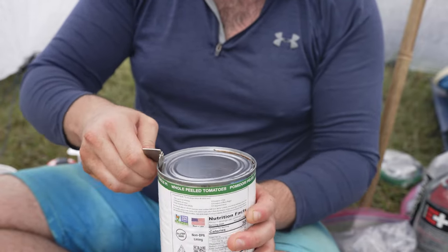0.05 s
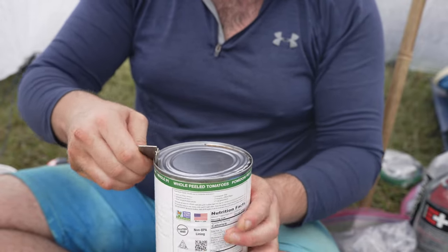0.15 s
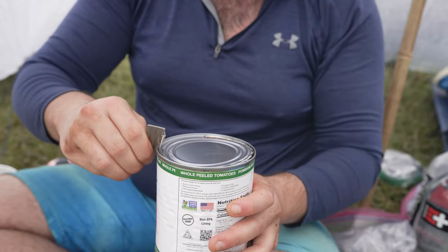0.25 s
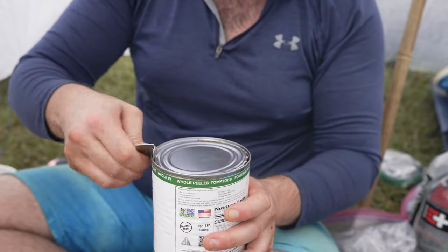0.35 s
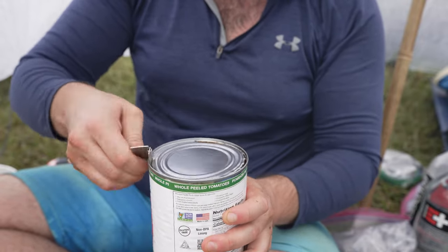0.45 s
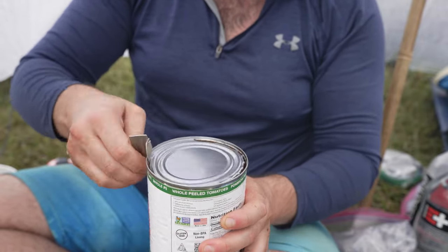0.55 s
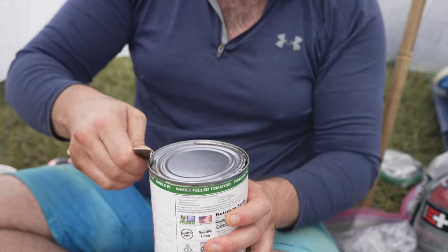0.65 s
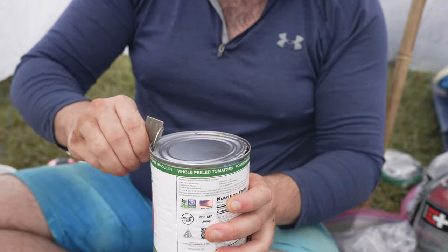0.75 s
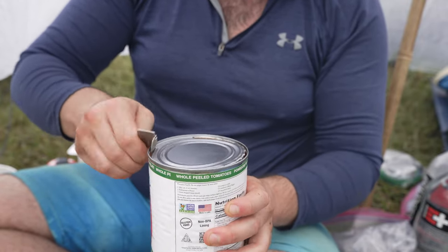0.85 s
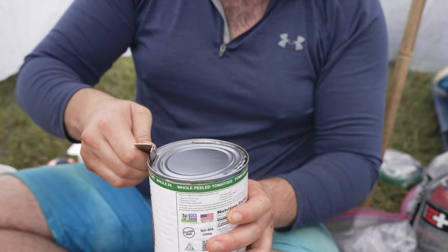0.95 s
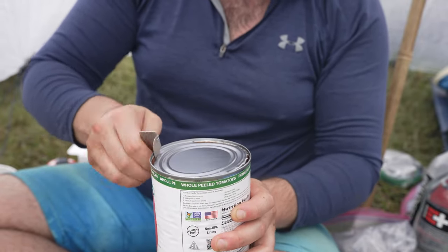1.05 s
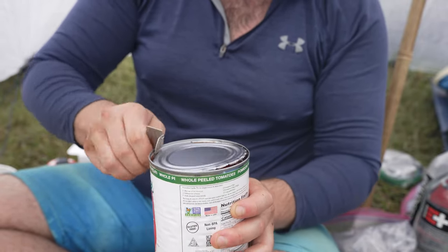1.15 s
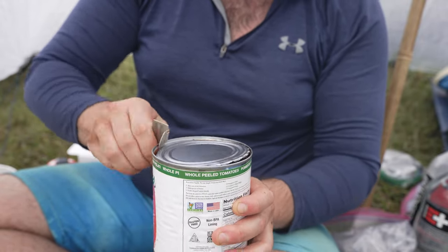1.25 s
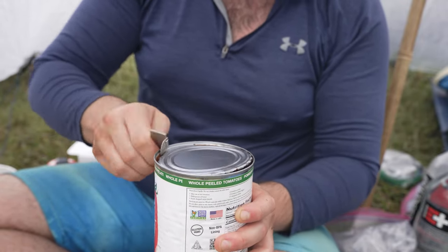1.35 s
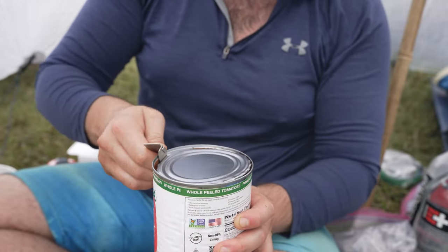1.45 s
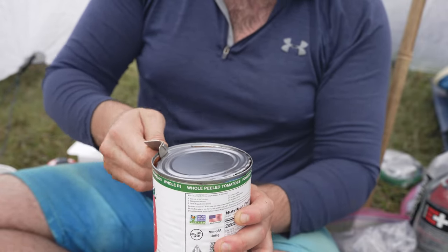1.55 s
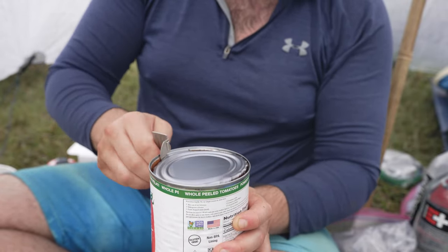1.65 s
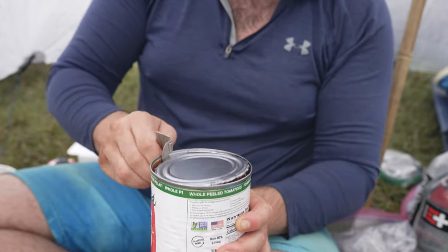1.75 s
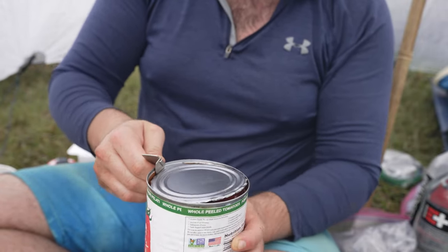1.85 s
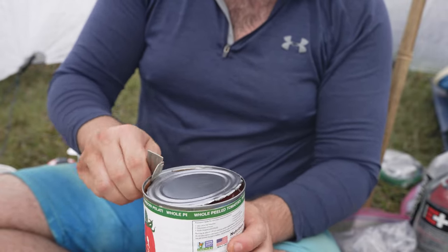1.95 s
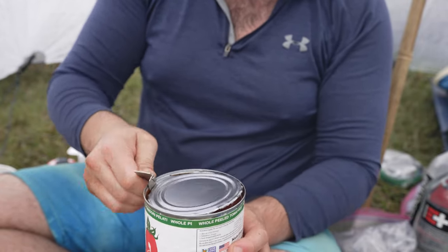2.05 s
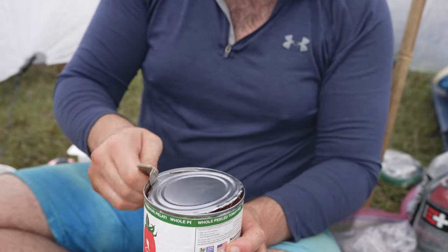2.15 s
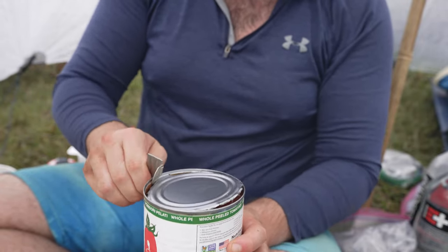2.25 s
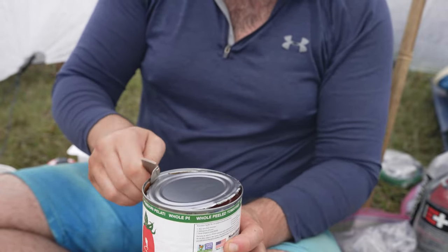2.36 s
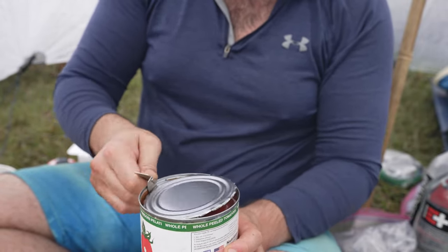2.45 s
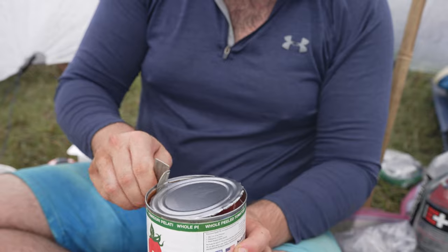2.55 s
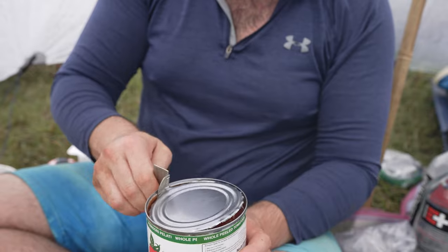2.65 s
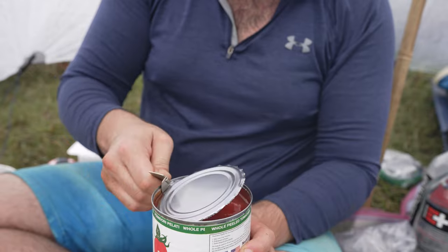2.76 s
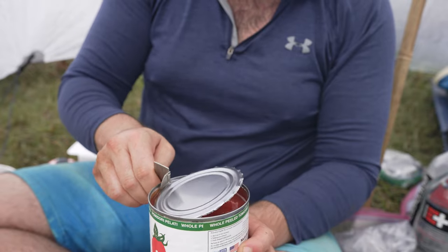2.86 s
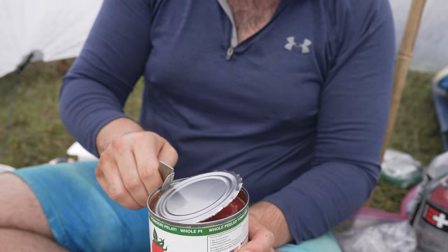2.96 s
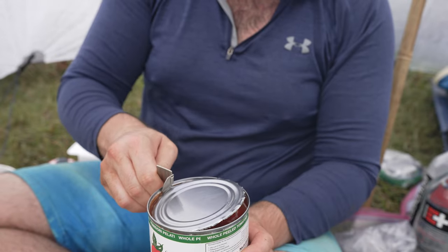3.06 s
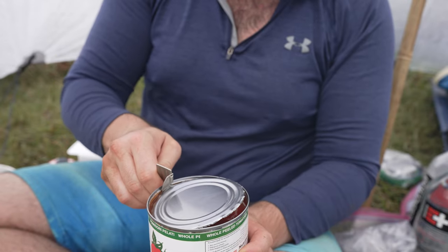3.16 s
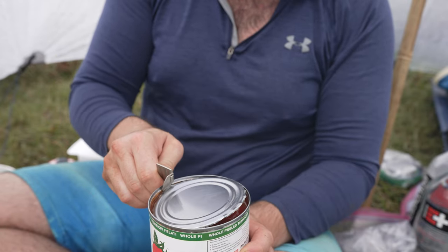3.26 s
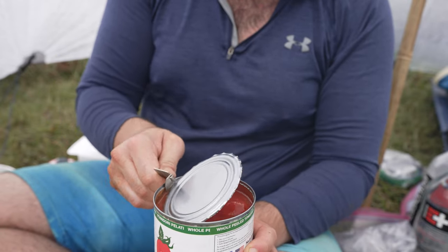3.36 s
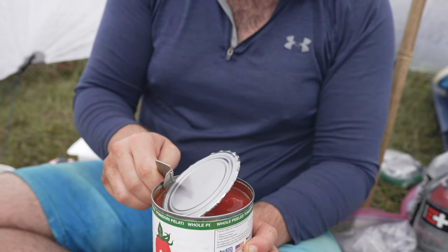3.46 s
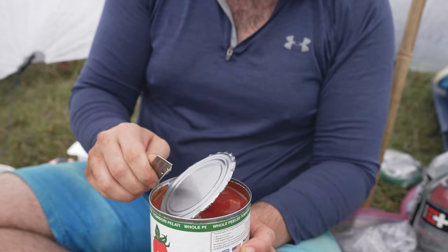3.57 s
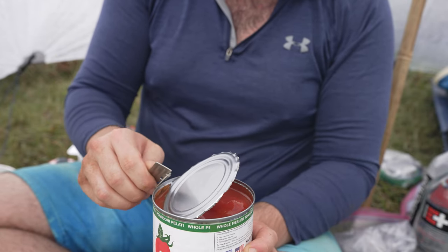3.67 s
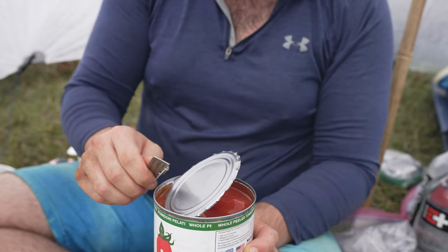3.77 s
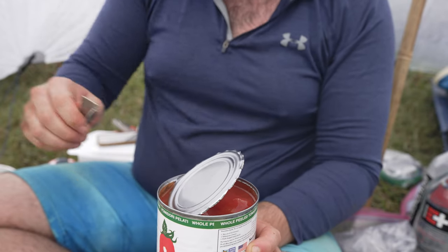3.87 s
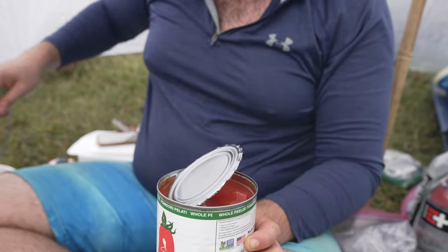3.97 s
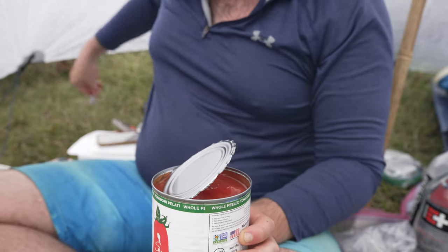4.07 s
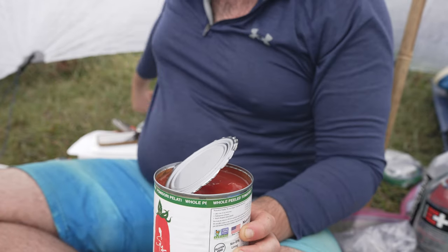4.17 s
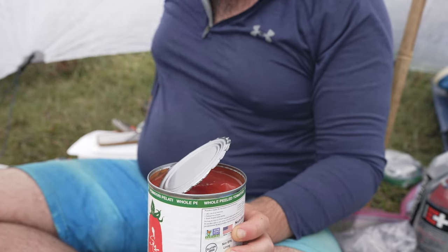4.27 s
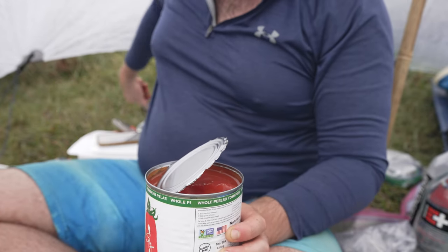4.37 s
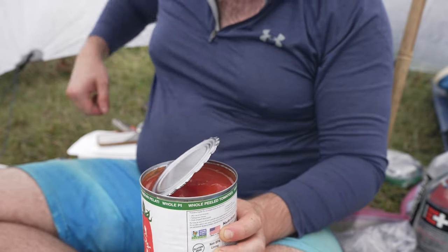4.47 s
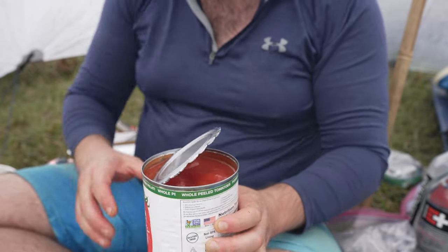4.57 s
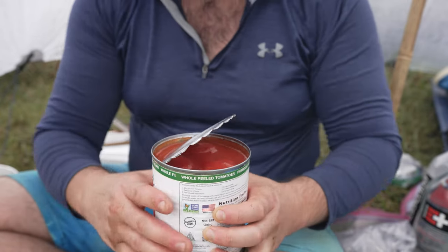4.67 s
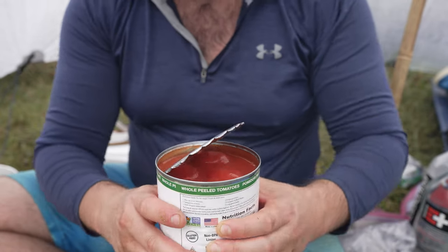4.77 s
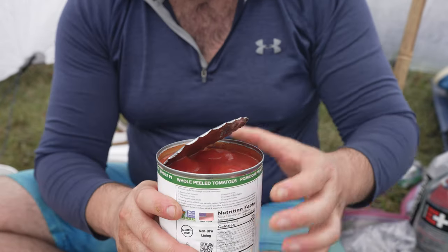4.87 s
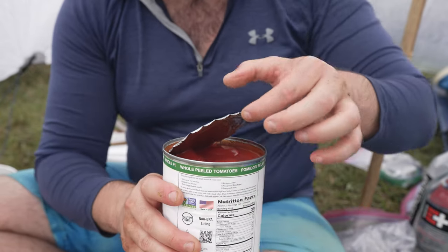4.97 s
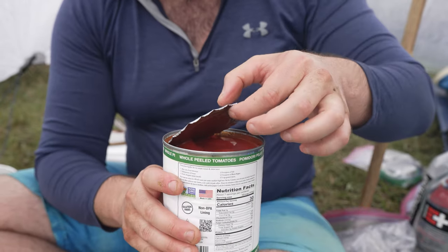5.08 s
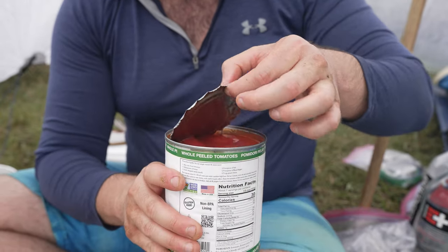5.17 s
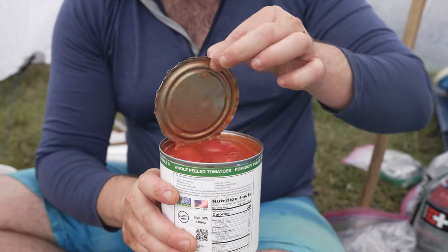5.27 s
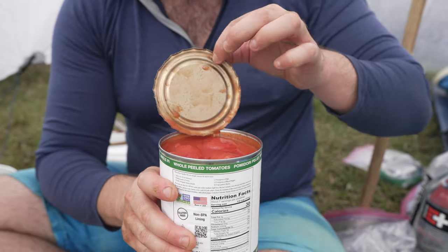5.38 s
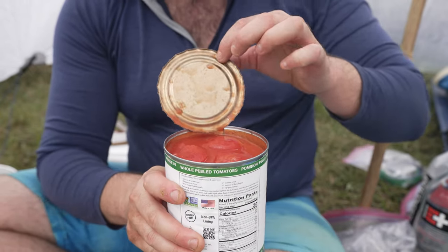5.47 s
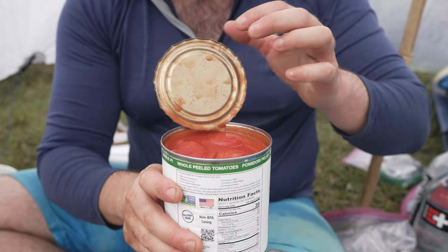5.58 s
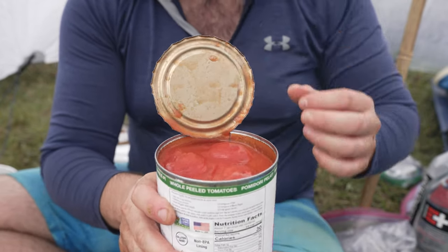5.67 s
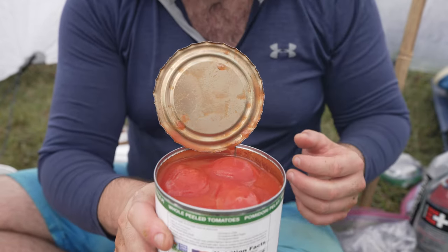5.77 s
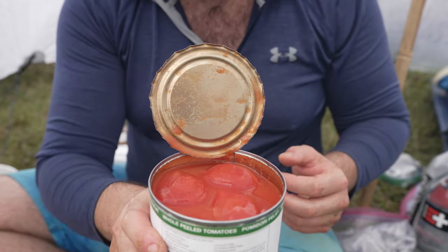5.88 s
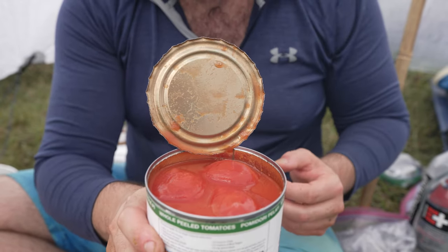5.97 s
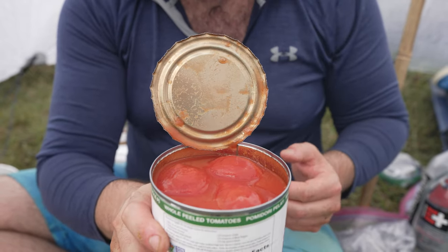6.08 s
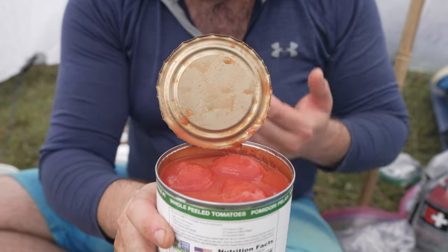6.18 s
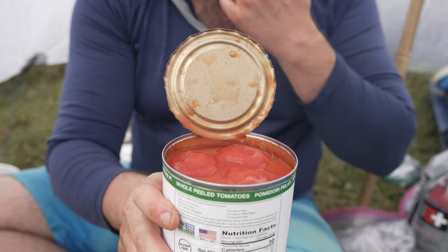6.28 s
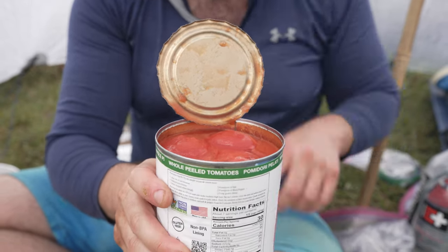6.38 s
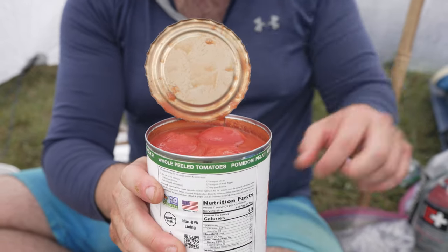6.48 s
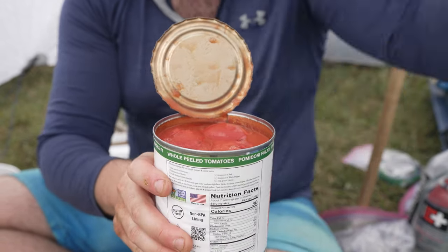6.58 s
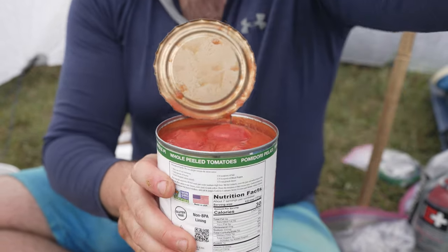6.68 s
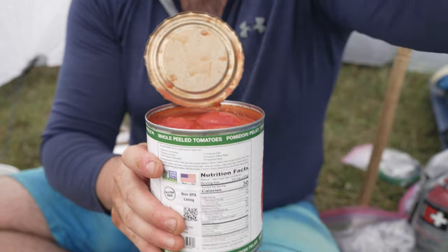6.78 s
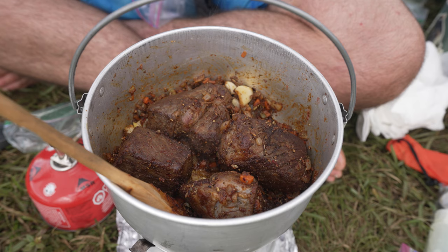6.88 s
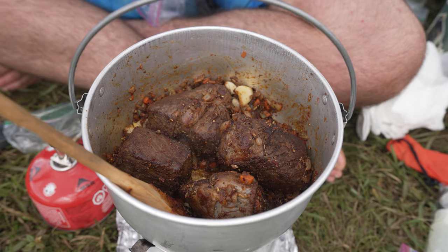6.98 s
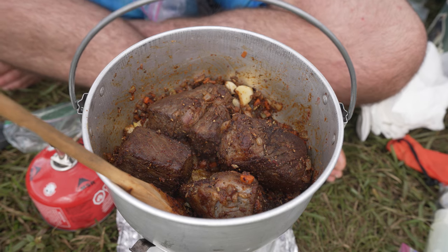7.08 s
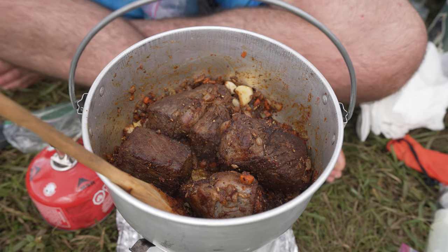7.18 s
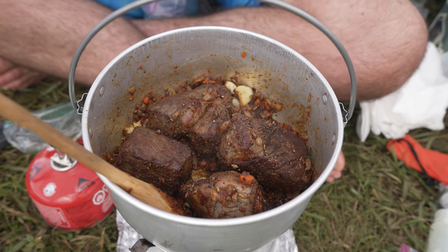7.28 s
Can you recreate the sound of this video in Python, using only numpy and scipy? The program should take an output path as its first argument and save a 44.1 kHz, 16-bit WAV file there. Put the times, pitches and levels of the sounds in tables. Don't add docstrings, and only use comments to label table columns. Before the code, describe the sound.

Over faint open air, distant machinery hum and cloth rustle, a hand opener bites sharply into a can, scraping and ticking along the rim, each cut quieter. Short dry lid knocks follow, then a bassless double clack as the tool lands among gear. Soft finger touches and a tinny lid snap come next, with bassy gusts on the close microphone and low mount thuds. A tiny gap cuts to gas hiss, pops and a faint steam squeak.

```python
import sys
import numpy as np
from scipy import signal
from scipy.fft import rfft, irfft, next_fast_len
from scipy.io import wavfile
from scipy.ndimage import uniform_filter1d

SR = 44100
rng = np.random.default_rng(int(sys.argv[2]) if len(sys.argv) > 2 else 0)


def how_loud(loudness_db):
    steps = np.asarray(loudness_db, float) / 20
    return 10 ** steps


def persist_wave(psi):
    counts = np.round(np.clip(psi, -1, 1) * 32767).astype(np.int16)
    wavfile.write(sys.argv[1], SR, np.atleast_2d(counts).T)


N = 323253
TIME = np.arange(N) / SR
FIRST_SHOT_END_S, STOVE_START_S = 6.9, 6.9165

BAND_EDGES_HZ = (650, 3550, 7500, 17000)
# [f/Hz, level per Hz/dB]
FIELD_TONE = [(18, -37), (30, -11.5), (316, -6), (360, -6), (550, -6), (862, -23), (1010, -27.5),
              (1180, -39), (1630, -28.5), (2060, -38), (16700, -51)]
# [f/Hz, level/dB]
FAR_HUM = [(425, -85), (570, -83), (680, -83.5)]
# [f/Hz, level per Hz/dB]
RUSTLE_SPECTRUM = [(500, -30), (1000, 6), (2000, 1), (4000, -1.5), (7000, -4.5), (12000, -6), (15500, -5),
                   (16700, -29.5)]
# [centre t/s, peak level/dB, fade per 10 dB/s]
SLEEVE_SWISHES = [(.12, -70.5, -0.2), (3.47, -75.5, 0.18), (4.02, -80, 0.1), (4.45, -72.5, -0.26),
                  (4.63, -71.5, 0.06), (4.8, -77.5, 0.35), (5.15, -72.5, -0.11), (5.6, -75.5, 0),
                  (5.95, -81.5, 0.23), (6.44, -78, 0.17), (6.53, -71.5, 0.1), (6.7, -70, 0.02)]
# [centre t/s, peak level/dB, fade per 10 dB/s]
WIND_GUSTS = [(.1, -77, 0.9), (.62, -67, -0.3), (1.06, -63.5, 0.22), (1.68, -69, 0.33), (2.1, -72.5, 0.6),
              (3.06, -68, 0.1), (3.4, -69.5, 0.05), (4.66, -68.5, 0), (5.3, -65, 0.3), (5.46, -49.5, 0.12),
              (5.63, -46, 0.11), (5.93, -48.5, 0.08), (6.08, -58, 0.3), (6.22, -69, 1.5), (6.48, -58, .07),
              (4.95, -72, 0)]
# [t/s, level/dB, build-up/ms, fall/ms, blade f/Hz]
BLADE_BITES = [(.006, -37, 4.7, 3.8, 4150), (0.0114, -30.5, 1.2, 1.1, 4070), (.035, -29.5, 1.26, 6, 4050),
               (0.1404, -32, 0.34, 5, 4230), (0.3421, -26.5, 2.5, 2.4, 4100), (0.36, -35, 4.8, 7.8, 4110),
               (0.3686, -31.5, 1.6, 4.5, 4090), (0.4759, -33, 9.4, 3.2, 4210),
               (0.536, -38, 11.6, 9.2, 4020), (0.6053, -33.5, 1.1, 3.5, 4100), (0.676, -27.5, 6, 2.3, 4230),
               (.679, -25, 1.1, 2.4, 4045), (.687, -38.5, 2.6, 2.2, 4300), (0.8378, -33, 2.2, 3, 4220),
               (0.844, -24, 0.95, 1.7, 3800), (0.8513, -29, 3.4, 4.7, 3990), (0.9701, -31, 1.3, 4.4, 4140),
               (0.9764, -29, 3, 4.7, 4250), (1.1067, -24.5, 3.8, 9.9, 4030), (1.156, -33, 1.6, 1.8, 3960),
               (1.163, -29.5, 1.4, 2.3, 4240), (1.2194, -31, 4, 6, 4210), (1.3356, -41, 0.65, 2, 3830),
               (1.3502, -34, 9, 2.2, 4340), (1.458, -30, 3.6, 8.8, 4350), (1.4768, -42, 1.3, 12, 4440),
               (1.5738, -32.5, 2.9, 5.3, 4450), (1.583, -38, 1.9, 5.6, 4180), (1.704, -32, 2.5, 4.3, 4060),
               (1.7132, -34.5, 3.1, 4.6, 4180), (1.8038, -39, 1.5, 7.6, 4300), (1.812, -37.5, 3.6, 3, 4440),
               (1.82, -38.5, 5.9, 1.7, 4330), (2.052, -46.5, .5, 9.7, 4330), (2.0648, -44.5, 3, 3.3, 4340),
               (2.205, -41.5, 11.5, 3.7, 4540), (2.341, -39.5, 3.3, 2.4, 4530),
               (2.483, -39.5, 1.6, 1.7, 4770)]
# [t/s, level/dB, build-up/ms]
BLADE_SCRAPES = [(0.075, -52, 3.1), (.2625, -52.5, 6.4), (0.3052, -58, 29), (0.4164, -44.5, 7.2),
                 (0.429, -56, 6), (0.4573, -51, 1.3), (0.741, -44, 3), (0.763, -39, 6), (0.781, -53, 7.3),
                 (0.8945, -52.5, 3.7), (0.9155, -42.5, 8.8), (1.0445, -44, 11.4), (1.093, -55.5, 5.4),
                 (1.201, -42.5, 3.5), (1.281, -47, 7.1), (1.2983, -39, 7), (1.315, -42, 3.4),
                 (1.3964, -54.5, 5.5), (1.4225, -42, 8.9), (1.536, -50, 21), (1.561, -42.5, 3.3),
                 (1.6383, -55.5, 7.9), (1.657, -55.5, 11), (1.779, -53, 24), (1.967, -58, 5.5),
                 (1.988, -60, 6.2), (2.0184, -61, 3), (2.265, -60, 4.6), (2.1417, -62.5, 25),
                 (2.279, -51, 3.7), (2.4204, -58, 31), (2.569, -55, 2.4), (2.5973, -55, 15)]
# [t/s, level/dB, treble/dB]
HOOK_TICKS = [(0.0878, -55.5, 0), (0.423, -48, -9), (0.509, -44.5, -21), (0.5167, -42, -17),
              (0.531, -40, -4.5), (0.5605, -48, -6), (0.6346, -44, -13), (0.8089, -43, -12),
              (0.943, -53, -32), (0.987, -43, -22), (1.0193, -47.5, -22), (1.0547, -49, -6),
              (1.0733, -50, -19), (1.2595, -42, -20), (1.289, -53, -6), (1.3071, -40.5, -3),
              (1.324, -44, -26), (1.3315, -48, -22), (1.3407, -34.5, -5), (1.468, -38.5, -1),
              (1.5514, -48, -11), (1.686, -48.5, 1), (1.6927, -40, -10), (1.862, -48, 0.5),
              (1.892, -58.5, 8), (1.9015, -61, 0), (2.1736, -54, 4), (2.3128, -50.5, 3.5),
              (2.3306, -42.5, -5), (2.4933, -46, 3.5), (.108, -73, 12), (.166, -67, 1), (0.212, -67, -12),
              (1.781, -50.5, 6.5), (1.945, -62, 0), (2.15, -62, 2), (2.651, -72, 2), (2.933, -68.5, -6.5),
              (2.96, -72, -13)]
# [f/Hz, level/dB, t60/s]
RIM_MODES = [(910, -12.5, 0.014), (1161, -12.5, 0.031), (1653, -1, 0.025), (2170, 10.5, 0.0037),
             (2626, 1.5, 0.013), (3690, -6.5, 0.021), (3970, -6, 0.014), (4230, 0, 0.013), (4230, 2, 0.02),
             (4400, -3.5, 0.029), (5000, -2, 0.014), (5406, -5, 0.031), (5990, -1.5, 0.014),
             (6320, -5, 0.022), (6540, -5, 0.01), (8580, -8, 0.0063), (10300, -11, 0.0034),
             (11460, -10, 0.0043), (13350, -6, 0.007)]
# [t/s, f/Hz, level/dB, t60/s]
RING_ON = [(0.0146, 4340, -44.5, 0.068), (.0355, 5000, -46, .04), (0.1395, 1620, -58, 0.07),
           (0.3686, 1120, -49.5, 0.07), (0.5378, 1670, -58, 0.11), (.8444, 2240, -38.5, .04),
           (.845, 3740, -28.5, .035), (.8515, 3820, -29, .04), (0.343, 2450, -34, .02),
           (0.6794, 4027, -26, .025), (1.1073, 930, -43.5, 0.054), (1.107, 5300, -34, 0.04),
           (1.165, 4130, -29, 0.057), (1.163, 2674, -45, 0.073), (1.219, 1560, -49, 0.1),
           (1.219, 4340, -31.5, 0.063), (1.467, 4435, -37.5, 0.082), (1.5734, 4230, -43.5, 0.096),
           (1.713, 4210, -38.5, 0.071), (1.7137, 5319, -48, 0.055), (1.819, 1580, -47, .05),
           (1.863, 4230, -49, 0.065), (2.7478, 1100, -55, .06), (3.3371, 4500, -45, .022),
           (3.3371, 6470, -42, .035), (3.6105, 860, -54.5, 0.042), (4.3436, 2519, -39, 0.042),
           (4.341, 9250, -39.5, 0.036), (4.341, 4440, -31.5, .025), (4.3445, 5390, -35.5, .025),
           (3.7911, 1520, -44, .012), (3.834, 5450, -39.5, .03), (0.3407, 8250, -39, 0.023),
           (0.011, 10300, -46, .02), (0.033, 5750, -40, .025), (.034, 8500, -35.5, .03),
           (.034, 10300, -42, .02), (0.1397, 6180, -36.5, .045), (0.1393, 8550, -47, .04),
           (5.258, 6900, -56, .05), (5.251, 9000, -38.5, .02)]
# [t/s, level/dB]
ARM_EFFORT = [(0, -84), (.5, -67), (.75, -70), (1.3, -57), (1.42, -65), (1.88, -69.5), (1.96, -63),
              (2.15, -63), (2.23, -84), (2.38, -64), (2.55, -68), (2.63, -85.5), (2.8, -72.5),
              (2.95, -79.5), (3.1, -96)]
# [t/s, level/dB, f/Hz, t60/s]
MOUNT_THUMPS = [
    (.995, -55, 100, 0.44),
    (3.025, -55, 140, .1),
    (6.736, -37, 124, 0.061),
    (6.805, -41.5, 294, 0.019),
    (6.856, -36.5, 413, 0.012),
    (5.47, -36.5, 45, .1),
    (5.646, -42.5, 170, 0.099),
    (5.668, -39.5, 74, 0.12),
    (5.91, -32, 62.8, 0.13),
    (5.951, -35, 70.5, .09),
]
# [t/s, level/dB, build-up/ms, fall/ms, treble/dB]
LID_PRYING = [(2.7377, -34, 1.2, 0.2, -8), (2.7464, -34, 3.8, 1.3, -3), (2.7842, -52.5, 26, 0.88, -4.5),
              (2.8778, -51.5, 3.9, 1.45, -11), (3.247, -72.5, 1, 0.97, 2), (3.28, -72.5, 8, 12, 6),
              (3.3755, -63, 6.2, 20, -7), (3.4772, -53, 1.6, 0.7, -9), (3.501, -61, 2.6, 5, -4),
              (3.389, -61.5, 2.8, 2.6, -5), (3.458, -70, 1.1, 1.5, 2), (3.595, -64, .7, 5, -1),
              (3.6043, -61, 3.9, 2.3, -14.5), (3.6103, -48.5, 9, 3.5, 6.5), (3.7045, -54, 0.18, 1.3, 11),
              (3.716, -68, 4.4, 13, 13), (3.7485, -56.5, .2, 1.8, 14), (3.757, -73, 4, 6, 4),
              (3.764, -60, 0.37, 1.5, 8), (3.7911, -48, 0.6, 3.2, 3.5), (3.7988, -51, .5, 5.5, 4),
              (3.805, -58, 0.23, 2.2, 11), (3.8345, -39.5, 1.4, 3.2, 4.5), (3.8465, -59, 4, 4.3, 6.5)]
# [f/Hz, level/dB, t60/s]
LOOSE_LID_MODES = [(1260, -10, 0.011), (1656, 22, 0.0028), (2446, 8, 0.018), (3020, 17, 0.0036),
                   (4540, -5, 0.023), (4930, -9.5, 0.0086), (5450, -0.5, 0.011), (6400, -6, 0.013),
                   (9460, -12.5, 0.011), (10940, -26, 0.0046), (14050, 0, 0.003)]
# [t/s, f/Hz, level/dB, t60/s]
BENT_LID_RINGS = [(3.3374, 8900, -35.5, .014), (3.3374, 5450, -43, .012), (6.2133, 3370, -48.5, 0.011),
                  (3.3374, 1470, -46.5, 0.0094), (5.253, 205, -42.5, 0.028), (5.2535, 810, -35, 0.017),
                  (5.2575, 1800, -43, 0.04), (5.256, 4400, -38.5, 0.018), (5.2587, 2960, -50.5, 0.087),
                  (5.4504, 1515, -55, 0.025), (5.451, 3420, -57, 0.02), (5.5602, 4400, -51, 0.035),
                  (5.561, 1460, -55, 0.033), (5.5617, 1840, -62, 0.095)]
# [t/s, level/dB, length/ms, treble/dB, body/dB]
FINGER_TOUCHES = [(3.3385, -44, 0.51, -8, -15), (4.433, -67, 1.8, -3, -2), (4.8822, -55.5, 0.62, 4.5, -5.5),
                  (5.0775, -69.5, 1.8, -1, -3), (5.104, -62, 0.48, -15, 0), (5.16, -63.5, 2, -0.5, -0.5),
                  (4.671, -74.5, 0.91, -12.5, 5), (4.8646, -75, 1.05, 5.5, -6), (5.2425, -70, 1.8, -12, 8),
                  (5.2518, -43.5, 0.96, 2, 0), (5.2547, -42, 0.73, -9, -1), (5.2575, -38, 1.2, -3, -4),
                  (5.4517, -60.5, 4.8, -10, -12), (5.561, -54, 2.9, -11, -9),
                  (6.2143, -58.5, 1.2, -11, -11), (6.221, -65, 0.54, -4, -9), (6.2816, -49, .2, 1, -24),
                  (6.3026, -67.5, 5.8, -11, -18), (6.348, -80, 0.98, 20, -13),
                  (6.4412, -63.5, 1.5, -1.5, -2.5), (6.463, -60.5, 3.9, -4, -6),
                  (6.478, -63.5, 4.2, -2, 0.5), (6.4828, -56, 0.86, -12, -9), (6.515, -64.5, 3, -1, -9),
                  (6.807, -66.5, 1, -23, 3.5), (6.86, -74, 2.4, 3, 9.5), (6.8718, -53, 1.05, -6, -11)]
# [f/Hz, level/dB, t60/s]
SOFT_MODES = [(1400, 0, .006), (2300, 0, .006), (3600, -2, .005), (4350, -1, .008), (5200, -2, .006),
              (8500, -4, .003), (12000, -5, .002)]
# [t/s, level/dB, build-up/ms, fall/ms, treble/dB, body/dB]
OPENER_LANDING = [
    (4.3128, -30.5, 0.34, 2.8, -5.5, -9.5),
    (4.3148, -30, 1.6, 5.2, -8.5, -10),
    (4.3305, -46, 1.5, 4, 1, -4.5),
    (4.3361, -25.5, 1.4, 2, -2, -18),
    (4.3395, -29.5, 1, 2.2, -3, -9.5),
    (4.3425, -22, 1.5, 4.7, -6.5, -13.5),
    (4.3505, -34, 1.8, 4.3, -4, -7),
    (4.3565, -40.5, 1.6, 5, -4, -4.5),
    (4.364, -47.5, 1.8, 11, -3, -3.5),
]
# [f/Hz, level/dB, t60/s]
TOOL_MODES = [(1100, -17.5, 0.0035), (1820, -9, 0.0099), (2640, 4, .008), (3320, 2.5, 0.0086),
              (4250, 2.5, 0.0056), (4785, 2.5, .007), (5300, -1, 0.0098), (7400, -5, 0.0054),
              (9000, -6.5, 0.004), (12350, -5.5, 0.0025), (14700, -5, 0.0018)]
# [t/s, level/dB]
MOUNT_WOBBLE = [
    (6.75, -53),
    (6.79, -42.5),
    (6.82, -30.5),
    (6.86, -35),
    (6.9, -26),
]
# [f/Hz, level per Hz/dB]
STOVE_TONE = [(24, -39), (40, 11), (53, -5), (201, 1), (234, -2.5), (626, -7), (1400, -18.5), (1590, -16),
              (11100, -18), (12300, -20), (15400, -20), (16700, -30)]
# [t/s, level/dB, lowest f/Hz, highest f/Hz]
SIMMER_POPS = [
    (6.9185, -41, 2000, 7500),
    (6.959, -42, 1500, 5500),
    (6.975, -43, 2000, 12000),
    (6.984, -46, 1500, 8000),
    (7.0175, -39, 3000, 15000),
    (7.043, -46, 8000, 14000),
    (7.093, -45, 2500, 9000),
    (7.2842, -38, 1500, 11000),
]


def band(x, lo_hz, hi_hz, order=2):
    return signal.sosfilt(signal.butter(order, [lo_hz, hi_hz], "band", fs=SR, output="sos"), x)


def unit(x):
    return x / np.sqrt(np.mean(x ** 2))


def curve(table, column):
    return np.interp(TIME, np.array(table)[:, 0], np.array(table)[:, column])


def walk(rate):
    k = int(SR / rate)
    held = np.repeat(rng.standard_normal(N // k + 1), k)
    return 4 / 3 * uniform_filter1d(uniform_filter1d(held, k), k)[:N]


def coloured(tone, flicker_db):
    n = next_fast_len(N)
    hz = np.maximum(np.arange(n // 2 + 1) * SR / n, 1)
    tone_hz, tone_db = np.transpose(tone)
    spectrum = rfft(rng.standard_normal(n)) * how_loud(np.interp(np.log(hz), np.log(tone_hz), tone_db))
    octave = np.clip(np.log2(hz / 60), 0, 8)
    noise = np.zeros(N)
    for k in range(9):
        layer = irfft(spectrum * np.maximum(1 - np.abs(octave - k), 0), n)[:N]
        noise += layer * how_loud(flicker_db * walk(5.8))
    return unit(noise)


def swells(events, rest_db):
    t = TIME[::64]
    power = how_loud(2 * rest_db)
    for s, db, fade in events:
        power = power + how_loud(2 * db - 20 * (np.abs(t - s) / max(fade, .02)) ** 1.4)
    return np.interp(TIME, t, 10 * np.log10(power))


def ring(s, hz, db, t60):
    out, start = np.zeros(N), int(np.ceil(s * SR))
    since = TIME[start:start + 12000] - s
    out[start:start + len(since)] = how_loud(db) * np.sin(2 * np.pi * hz * since) * np.exp(-np.log(1000) * since / t60)
    return out


def bursts(events, modes, crack_db, grit_db, vary_db, fall_share, body_db=-17, loosen_db=0, blade_hz=()):
    lead = 1152
    out = np.zeros(N + 8192)
    t = np.arange(2048) / SR
    ms = (np.arange(2560) - lead) * 1000 / SR
    hz, db, t60 = np.transpose(modes)[:, :, None]
    decay = np.exp(-np.log(1000) * t / t60)
    group = np.digitize(hz[:, 0], BAND_EDGES_HZ[1:3])
    blade = (hz > 3700) & (hz < 4600)
    for n, (s, mid_db, rise, fall, treble_db, *body) in enumerate(events):
        build_db = np.where(ms < -rise, -200, -10 * np.sqrt(np.clip(-ms / max(rise, .1), 0, 1)))
        shape_db = np.where(ms < 0, build_db, -10 * ms / max(fall * fall_share, .1))
        size_db = grit_db * np.repeat(rng.exponential(size=len(ms) // 8), 8)
        slips = rng.standard_normal(len(ms)) * how_loud(size_db + shape_db)
        mode_level, mode_tuning = rng.standard_normal((2, len(group), 1))
        mode_hz = hz * (1 + .012 * mode_tuning)
        if n < len(blade_hz):
            mode_hz = np.where(blade, blade_hz[n] * (1 + .6 * (hz / 4200 - 1)), mode_hz)
        rings = how_loud(db + vary_db * mode_level) * decay * np.sin(2 * np.pi * mode_hz * t)
        low_db = body[0] if body else body_db + loosen_db * s + max(treble_db, 0) / 2
        sound = 0
        for k, level_db in enumerate((mid_db + low_db, mid_db, mid_db + treble_db)):
            part = signal.fftconvolve(slips, rings[group == k].sum(axis=0))
            part[:len(slips)] += how_loud(crack_db) * slips
            part = band(part, BAND_EDGES_HZ[k], BAND_EDGES_HZ[k + 1], order=3)
            peak_rms = np.sqrt(uniform_filter1d(part ** 2, size=70).max())
            sound = sound + part * how_loud(level_db) / peak_rms
        start = int(s * SR) - lead - 20
        out[max(start, 0):start + len(sound)] += sound[max(-start, 0):]
    return out[:N]


def field():
    air = coloured(FIELD_TONE, flicker_db=1.54) * how_loud(-67)
    for hz, db in FAR_HUM:
        level = how_loud(db + 4 * np.clip(walk(2.5), -3, 1))
        drift_s = np.cumsum(.004 * walk(2)) / SR
        air += level * np.sin(2 * np.pi * hz * (TIME + drift_s))
    return air


def sleeves():
    grain_db = 1.2 * np.repeat(rng.exponential(size=N // 64 + 1), 64)[:N] + 0.8 * walk(31)
    rustle = unit(coloured(RUSTLE_SPECTRUM, flicker_db=1.5) * how_loud(grain_db))
    return rustle * how_loud(swells(SLEEVE_SWISHES, rest_db=-81.5))


def wind():
    calm_db = -83.5
    wind_db = swells(WIND_GUSTS, calm_db)
    buffet = band(rng.standard_normal(N), 24, 92)
    steady = buffet / np.sqrt(uniform_filter1d(buffet ** 2, size=2600))
    gust = steady * how_loud(wind_db + 1.5 * walk(3.3))
    flutter_db = -83 + 0.45 * (wind_db - calm_db)
    flutter = unit(band(rng.standard_normal(N), 97, 200)) * how_loud(flutter_db + 2.0 * walk(25))
    return gust + flutter


def cutting():
    brighten = 4.5
    strokes = []
    for s, db, rise, fall, _ in BLADE_BITES:
        fresh_db = 5 * np.exp(-s / 0.23)
        strokes.append((s, db, rise, fall, -14 + brighten * s + fresh_db))
    for s, db, rise in BLADE_SCRAPES:
        strokes.append((s, db, rise, 7.5, -15 + brighten * s))
    for s, db, treble_db in HOOK_TICKS:
        strokes.append((s, db, 1.4, 2.6, treble_db))
    cut = bursts(strokes, RIM_MODES, crack_db=12, grit_db=1.5, vary_db=4, fall_share=0.69,
                 body_db=-21.0, loosen_db=3.5, blade_hz=np.array(BLADE_BITES)[:, -1])
    return cut + sum(ring(*row) for row in RING_ON)


def drag():
    t = TIME[::64]
    lift = np.max([np.exp(-((t - bite[0] - .034) / .012) ** 2 / 2) for bite in BLADE_BITES], axis=0)
    grain_db = 2.8 * np.repeat(rng.exponential(size=N // 24 + 1), 24)[:N] + 1.6 * walk(31)
    rub = unit(coloured(RUSTLE_SPECTRUM, flicker_db=1.0) * how_loud(grain_db))
    rub = rub * how_loud(curve(ARM_EFFORT, 1) - 8 * np.interp(TIME, t, lift))
    strong = band(rub, 3500, 3700) + band(rub, 4100, 4500) + band(rub, 10500, 11000)
    weak = band(rub, 5900, 6700) + band(rub, 2250, 2550)
    return how_loud(-3.5) * rub + how_loud(3) * strong + weak


def handling():
    thumps = sum(ring(s, hz, db, t60) for s, db, hz, t60 in MOUNT_THUMPS)
    swing = np.cos(2 * np.pi * 42.5 * (TIME - 6.845))
    return thumps + how_loud(curve(MOUNT_WOBBLE, 1)) * (TIME > MOUNT_WOBBLE[0][0]) * swing


def prying():
    return bursts(LID_PRYING, LOOSE_LID_MODES, crack_db=12, grit_db=2.5, vary_db=4, fall_share=0.38, body_db=-14.5)


def fingers():
    contacts = [(s, db, ms, ms, treble_db, body_db) for s, db, ms, treble_db, body_db in FINGER_TOUCHES]
    touches = bursts(contacts, SOFT_MODES, crack_db=23, grit_db=2.5, vary_db=2, fall_share=0.93)
    return touches + sum(ring(*row) for row in BENT_LID_RINGS)


def toss():
    landing = bursts(OPENER_LANDING, TOOL_MODES, crack_db=11.5, grit_db=1.9, vary_db=2, fall_share=0.92)
    return band(landing, 1000, 18000)


def stove():
    hiss = coloured(STOVE_TONE, flicker_db=0.6) * how_loud(-49.5)
    since = TIME - STOVE_START_S
    sway_fade = np.exp(-np.log(1000) * np.abs(since) / 1.46)
    sway = how_loud(-35) * np.cos(2 * np.pi * 11.6 * since) * sway_fade
    spit = rng.standard_normal(N)
    pops = np.zeros(N)
    for s, db, lo_hz, hi_hz in SIMMER_POPS:
        snap = (TIME > s) * np.exp(-np.abs(TIME - s) / .001)
        pops += how_loud(db) * snap * unit(band(spit, lo_hz, hi_hz))
    squeak_start, squeak_end = 7.232, 7.285
    pitch = np.interp(TIME, (squeak_start, squeak_end), (8500, 6000)) * (1 + .01 * walk(100))
    squeak = how_loud(-60) * np.sin(2 * np.pi * np.cumsum(pitch) / SR)
    squeak = squeak * (TIME > squeak_start) * (TIME < squeak_end)
    return hiss + sway + pops + squeak


def shelter(x):
    t = np.arange(4096) / SR
    echo = unit(rng.standard_normal(len(t)) * np.exp(-np.log(1000) * t / 0.033) * (t > .002))
    return x + how_loud(-51.0) * signal.fftconvolve(x, echo)[:N]


def scene():
    can_work = shelter(cutting() + prying() + fingers() + toss())
    first = can_work + drag() + field() + sleeves() + wind() + handling()
    first = first * np.clip((FIRST_SHOT_END_S - TIME) / 0.0058, 0, 1)
    return (first + stove() * (TIME > STOVE_START_S))[None]


def low_pass(x):
    return signal.sosfilt(signal.butter(12, 16810, fs=SR, output="sos"), x)


def record(dry):
    mix = signal.sosfilt(signal.cheby2(10, 27, 16050, fs=SR, output="sos"), dry)
    air = signal.sosfiltfilt(signal.butter(10, 12900, "high", fs=SR, output="sos"), mix)
    faint = uniform_filter1d(air ** 2, size=1024) < how_loud(2 * -91.5)
    mix = mix - air * uniform_filter1d(1. * faint, size=256)
    return low_pass(mix)


dry = scene()
out = record(dry)
persist_wave(out)
```